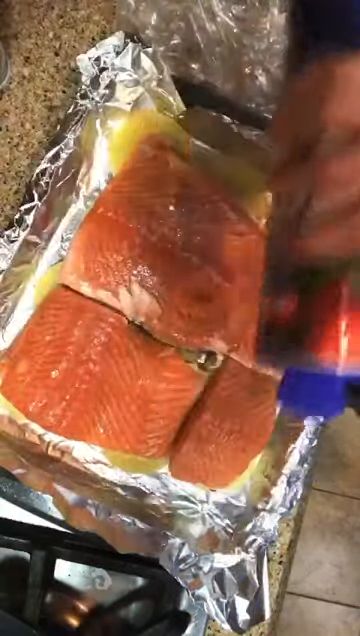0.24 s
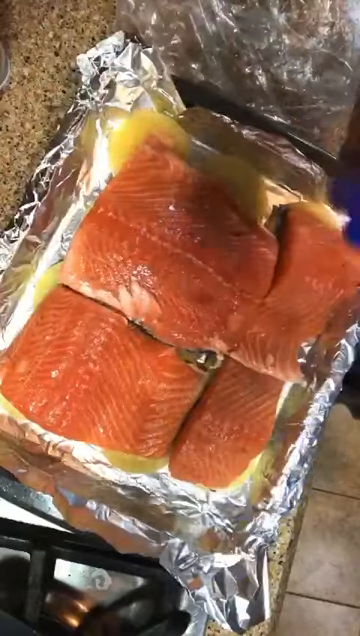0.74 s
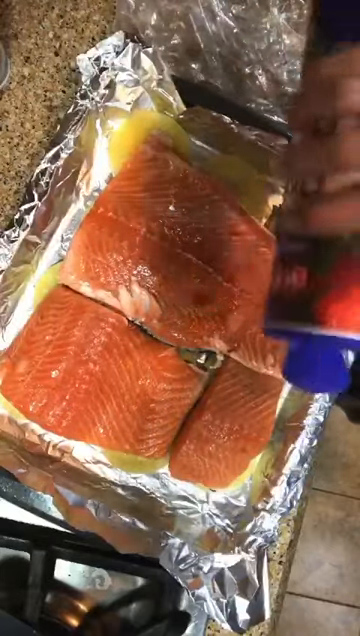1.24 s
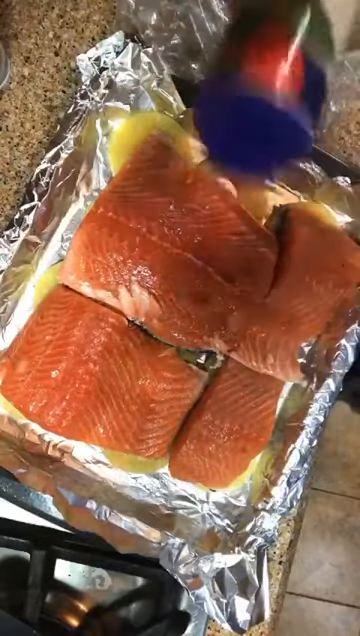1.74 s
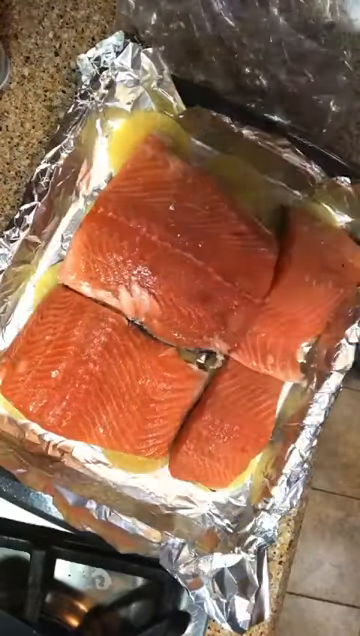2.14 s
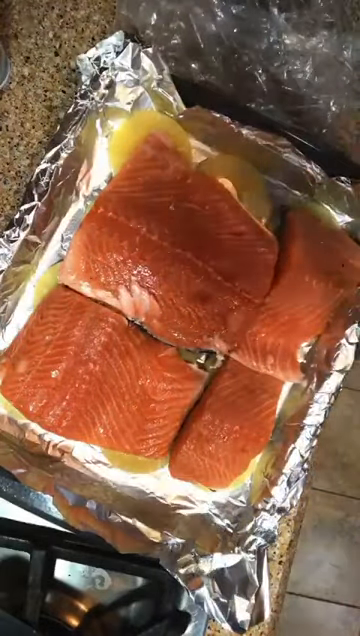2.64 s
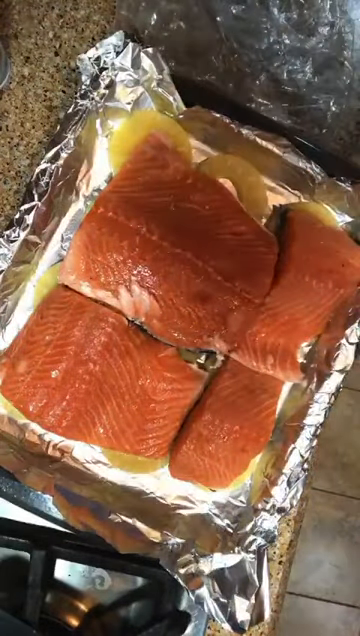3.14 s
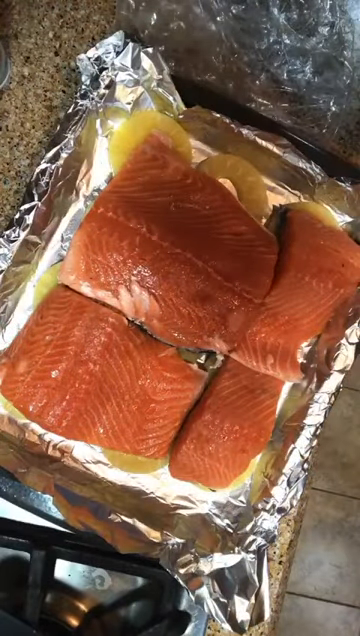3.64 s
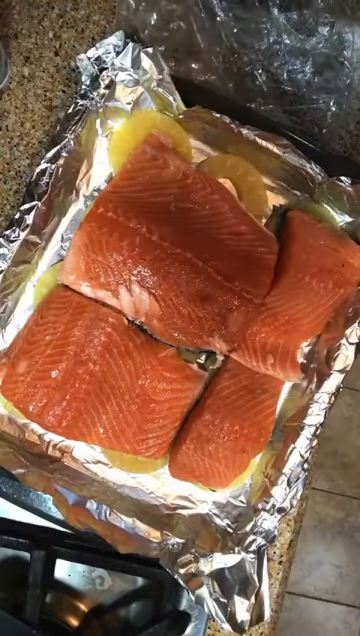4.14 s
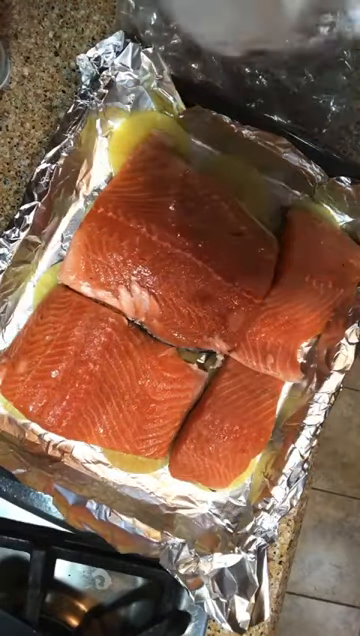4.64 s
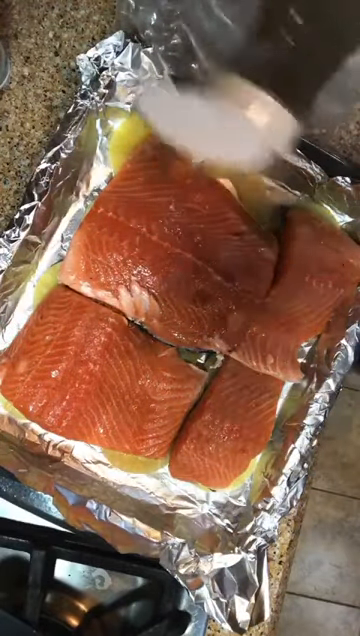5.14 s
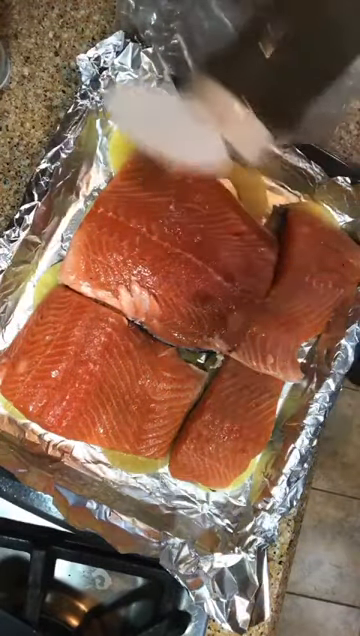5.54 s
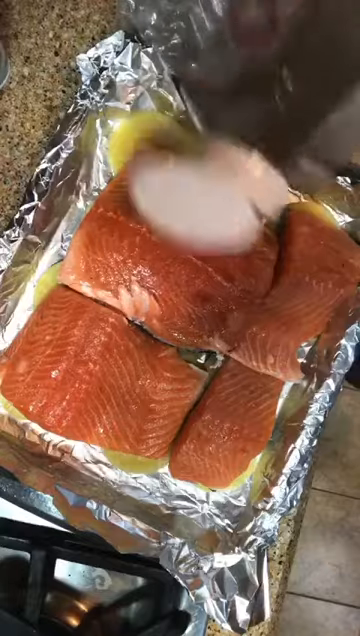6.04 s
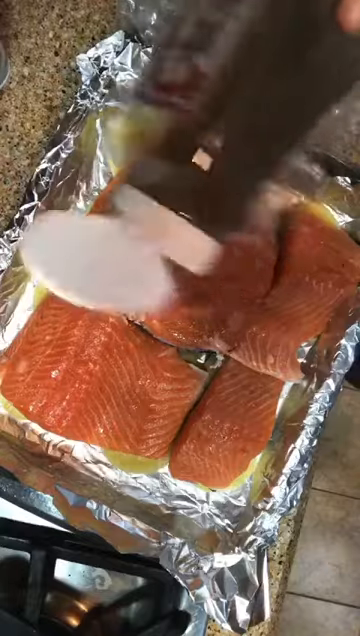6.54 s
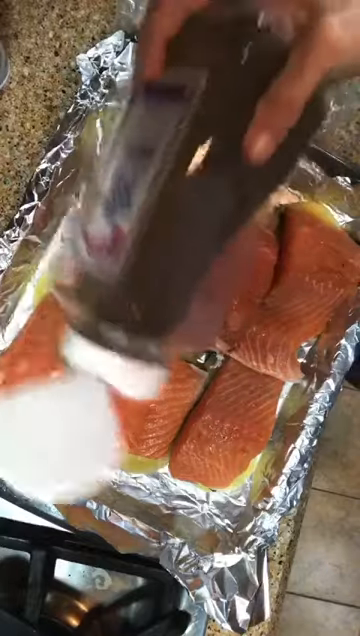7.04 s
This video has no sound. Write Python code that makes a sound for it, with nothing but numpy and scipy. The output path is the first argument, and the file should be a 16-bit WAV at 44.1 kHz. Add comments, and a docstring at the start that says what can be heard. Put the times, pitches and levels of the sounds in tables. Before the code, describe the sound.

Dry seasoning shaken in eight quick rattles, shaker cracked down on a counter, containers knocking and wobbling, then soft finger taps and small pours of grains.

```python
"""Seasoning is shaken over fish in a quiet kitchen: noise-like grain impacts surge up and down the shaker.
A faint wavering tone fades early on; then the shaker is set down, a cracking base over a thudding counter.
A jar chatters and containers knock and wobble as the next one is fetched: damped modes and noise bursts.
Fingers tap, and grains slide out in a few gentle pours of the same impacts.
Throughout, sleeves rub in fine slips, an appliance hums, and a hard room answers the knocks and grains."""
import sys
import numpy as np
from scipy import signal
from scipy.fft import rfft, irfft, next_fast_len
from scipy.io import wavfile
from scipy.ndimage import map_coordinates

SR = 44100
rng = np.random.default_rng(int(sys.argv[2]) if len(sys.argv) > 2 else 0)


def to_wav(s):
    """Save 16-bit WAV."""
    ch = np.atleast_2d(s).T  # columns
    pcm = np.round(np.clip(ch, -1, 1) * 32767)  # PCM
    wavfile.write(sys.argv[1], SR, pcm.astype(np.int16))


N = 321489  # length in samples

# shakes, grains flying to the base on the lift, then to the lid on the throw:
# throw_crest_s, throw_level_db, lift_level_db
SHAKES = [(.152, -50.5, -53), (.365, -52, -56), (0.569, -54, -56.5), (0.811, -51, -54.5), (1.015, -54, -59),
          (1.226, -51.5, -61), (1.478, -51, -56.5), (1.71, -51.5, -56)]
LIFT_LEAD_S = 0.087  # the lift crests this long before the throw
LIFT_RISE_S, LIFT_FALL_S = 0.07, 0.084  # each over 20 dB
THROW_RISE_S, THROW_FALL_S = 0.11, 0.063  # each over 20 dB
# grains sliding in a tilted container: crest_s, level_db, length_s (20 dB up and 20 dB down)
SLIDES = [(2.103, -55.5, 0.26), (3.56, -52.5, 0.22), (4.74, -63.5, 0.61), (5.13, -62, .4)]
SLIDE_RISE_SHARE = 0.51  # part of a slide spent swelling
# a jolt lets the heap slip at once: crest_s, level_db, fall_s (over 20 dB)
SPILLS = [(3.449, -62, .07), (5.016, -65, .14), (5.116, -53, .06), (5.571, -61, 0.22), (6.474, -65.5, 0.24),
          (6.748, -42, 0.06)]
SPILL_RISE_S = 0.016  # over 20 dB
# sharp ticks of coarse grains on the plastic: start_s, level_db, low_cut_hz
TICKS = [(.2882, -34.5, 9050), (.4515, -35, 800), (.457, -41, 2000), (.466, -42, 3000), (.499, -42.5, 2000),
         (.955, -44, 7000), (6.734, -36.5, 1500), (6.746, -35, 6000), (6.753, -43, 5000)]
# colour of grains in a plastic container: pitch_hz, level_db (per Hz, relative)
GRAIN_COLOUR = [(500, -32), (1500, -8.5), (2300, -6.5), (3000, -3.5), (4200, -1.5), (5200, -1.5),
                (6400, 0.5), (8200, -.5), (10200, -2.5), (12000, -1), (14000, 1), (15000, -2),
                (15800, -1.5)]

# the shaker lands and rocks: start_s, level_db, brightness_hz, thud_db (relative to level_db)
LANDINGS = [(2.4324, -14.5, 5500, -0.5), (2.457, -35, 2500, 8.5), (2.482, -31, 2000, -12),
            (2.510, -31.5, 1500, 1), (2.556, -40.5, 1000, 7)]
# modes of the shaker's base: pitch_hz, level_db (relative), t60_s
BASE_MODES = [(346, -9, 0.074), (707, -10, 0.049), (872, -8, 0.038), (976, -11, 0.11), (1052, -2.5, 0.024),
              (1670, -17, 0.016), (1803, -21.5, 0.078), (2280, -10.5, 0.0065), (2680, -22, 0.0075),
              (3560, -7.5, 0.0051)]
# modes of the counter: pitch_hz, level_db (relative), t60_s
COUNTER_MODES = [(92, -13, 0.15), (126, -10, 0.067), (167, -3, 0.074), (208, -1.5, 0.062), (274, -9, 0.047)]
# colour of a bare contact: pitch_hz, level_db (per Hz, relative)
CRACK_COLOUR = [(100, -2), (480, 0), (1000, 12), (1500, 0.5), (2300, 0), (3500, -2.5), (4700, -5.5),
                (6500, -3.5), (8000, -11), (14500, -10)]

# nudges of a light jar: start_s, level_db, brightness_hz, thud_db (relative to level_db)
NUDGES = [(3.170, -37, 2200, -10), (3.1746, -29, 2200, -15), (3.178, -30, 2200, -18),
          (3.184, -33, 1800, -19), (3.221, -39.5, 2200, -1), (3.267, -49, 900, 17.5)]
# modes of the jar: pitch_hz, level_db (relative), t60_s
JAR_MODES = [(366, -5.5, 0.097), (650, -10, 0.035), (750, -10.5, 0.086), (1180, -13, 0.035),
             (1265, -15, 0.067), (1360, -3.5, .05), (1584, -8, .073), (1710, -8.5, 0.034),
             (1945, -2.5, 0.028), (2300, -6.5, 0.022), (2600, -17, .018), (2950, -21, .02),
             (4130, -30, .05), (5400, -27, .05)]
# modes of the jar's lid: pitch_hz, level_db (relative), t60_s
LID_MODES = [(4160, 6, 0.027), (4400, -2, 0.017), (5650, 0, .01)]
LID_CLICK_S, LID_CLICK_DB = 3.26, -52

# bumps and wobbles of a ringing container:
# start_s, level_db, brightness_hz, thud_db, ring_db (the last two relative to level_db)
KNOCKS = [(3.4467, -38, 6000, -7, 6.5), (3.449, -30.5, 2600, 8.5, -3), (3.455, -34.5, 1800, -8, -12),
          (3.604, -20, 3020, -15, -3), (3.608, -24.5, 1800, -1.5, -4), (3.637, -31, 1800, -10, 9.5),
          (3.667, -26, 3200, -23, 0), (3.671, -19.5, 1700, -4, -2.5), (3.712, -25, 2780, -12, 1.5),
          (3.75, -34.5, 1600, -16, -13)]
# modes of the quickly damped walls: pitch_hz, level_db (relative), t60_s
WALL_MODES = [(358, -16, 0.066), (507, -18, 0.049), (762.4, -13.5, 0.12), (945, -12.5, 0.036),
              (1120, -10.5, 0.077), (1233, -9, .07), (1325, -6.5, 0.058), (1374, -11.5, 0.16),
              (1528, -11, .11), (1760, -11.5, 0.036), (1983, -8.5, 0.028), (2210, -13.5, .024),
              (2900, -16, 0.03)]
# container tones that hang on: pitch_hz, level_db (relative), t60_s
LASTING_TONES = [(1623, -14.5, .5), (3720, -24, 0.35)]
# modes of the board under the containers: pitch_hz, level_db (relative), t60_s
SHELF_MODES = [(122, -11.5, .07), (142, -6.5, 0.071), (159, -5.5, 0.075), (200, -6.5, 0.049),
               (237, -12.5, .043)]
# colour of a dull contact: pitch_hz, level_db (per Hz, relative)
CLACK_COLOUR = [(100, -9), (400, -7), (750, -1.5), (1400, 3.5), (2200, -6), (3200, -10.5), (4500, -20.5),
                (8000, -25), (14500, -50)]

# strokes of hand and sleeve: fastest_s, level_db, length_s
RUBS = [(0.954, -54, 0.16), (1.533, -64, 0.21), (2.275, -63.5, 0.23), (4.204, -56.5, 0.21),
        (4.663, -58, 0.3), (5.113, -62, 0.29), (5.61, -66.5, 0.13), (5.81, -58.5, 0.18),
        (6.417, -57.5, 0.14), (6.96, -63, 0.31)]
RUB_RISE_SHARE = 0.42  # part of a stroke spent speeding up
RUB_EDGE_DB = 7.5  # a stroke's ends lie this far below its crest
# colour of the sleeve: pitch_hz, level_db (per Hz, relative)
SLEEVE_COLOUR = [(300, -9), (900, -4), (1500, 0), (2800, -2), (4500, -5.5), (7000, -8.5), (10000, -16.5),
                 (15000, -16)]
# finger taps on a hollow container, pitched by the grip: start_s, level_db, pitch_ratio
TAPS = [(4.380, -43, 0.94), (4.405, -52, 1), (4.548, -42, 0.97), (4.573, -43.5, 1), (6.472, -41, .88),
        (6.5, -50, 0.87)]
# modes of the hollow container: pitch_hz (at pitch_ratio 1), level_db (relative), t60_s
HOLLOW_MODES = [(863, -5, .04), (999, -2, 0.054), (1104, -2.5, 0.056), (1334, -8, 0.035), (1490, -7, 0.038),
                (1850, -11, 0.027), (2310, -7.5, .03)]

# partials of the appliance hum: pitch_hz, level_db (mean rms)
HUM_PARTIALS = [(59.8, -70), (119.9, -62.5), (239.8, -76), (329, -80.5), (359.6, -82.5), (749, -78.5),
                (960, -79)]
# colour of the still room air: pitch_hz, level_db (per Hz, relative)
AIR_COLOUR = [(20, -1), (35, 2), (62, -2), (90, -9.5), (135, -12.5), (200, -15), (330, -17.5), (500, -19),
              (1000, -21), (2000, -26), (4000, -32), (9000, -39.5), (15500, -44.5)]
WAVER_CREST_S, WAVER_DB, WAVER_LENGTH_S = 0.5, -72.5, 1.0  # the faint tone
WAVER_HZ, WAVER_SWING_HZ = 636, 22.2
# decay of the room's tail: pitch_hz, t60_s
ROOM_DECAY = [(100, 0.41), (300, 0.44), (1000, 0.56), (3000, 0.55), (7000, 0.51), (14000, 0.32)]
TOP_HZ = 15800  # upper band limit


def amp(db):
    """Decibels to gain."""
    return 10 ** (np.asarray(db) / 20)


def unit(x):
    """Scale to rms 1."""
    return x / np.sqrt(np.mean(x ** 2) + 1e-20)


def along(points, hz):
    """(Hz, value) points read along a log frequency axis."""
    f, v = np.transpose(points)
    return np.interp(np.log(hz + 1), np.log(f), v)


def filtered(x, response):
    """x with its spectrum multiplied by a response of frequency."""
    m = next_fast_len(len(x) + SR // 2)
    spectrum = rfft(x, m) * response(np.fft.rfftfreq(m, 1 / SR))
    return irfft(spectrum, m)[:len(x)]


def coloured(x, colour):
    """x shaped by a spectral colour, at rms 1."""
    return unit(filtered(x, lambda hz: amp(along(colour, hz))))


def wobble(rate):
    """A smooth random curve with rate knots a second."""
    knots = rng.standard_normal(int(N * rate / SR) + 4)
    return map_coordinates(knots, [np.arange(N) * rate / SR])


def add(track, s, sound):
    """Mix a sound into the track at time s."""
    part = track[round(s * SR):][:len(sound)]
    part += sound[:len(part)]


def ring(modes, scatter_db):
    """A struck body: decaying sines, at new strengths for each blow."""
    t = np.arange(SR // 2) / SR
    out = np.zeros(len(t))
    for k, (hz, db, t60) in enumerate(modes):
        level = amp(db + scatter_db * rng.standard_normal() - 60 * t / t60)
        out += (-1) ** k * level * np.sin(2 * np.pi * hz * t)  # neighbours start in opposite phase
    return out


def burst(colour, t60):
    """A dying burst of noise, standing for many dense, damped modes."""
    t = np.arange(SR // 2) / SR
    return coloured(rng.standard_normal(len(t)), colour) * amp(-60 * t / t60)


def soften(x, hz):
    """A gentle low-pass: a softer contact passes less treble."""
    return signal.lfilter(*signal.butter(1, min(hz, SR / 2 - 1), fs=SR), x)


def in_room(x, wet_db):
    """x with a diffuse tail of noise, each frequency dying at its own speed."""
    hz, t, z = signal.stft(rng.standard_normal(SR), SR, nperseg=256)
    decay = amp(-60 * t / along(ROOM_DECAY, hz)[:, None])
    tail = signal.istft(z * decay, SR, nperseg=256)[1]
    tail *= 1 - np.exp(-np.arange(len(tail)) / SR / 0.006)  # echoes build up from the nearest surfaces
    tail /= np.linalg.norm(tail)
    return x + amp(wet_db) * signal.fftconvolve(x, tail)[:len(x)]


def impacts(rate, spread_db):
    """Random impacts of about unit mean power, rate a second, of varied size."""
    sizes = unit(rng.standard_normal(N) * amp(spread_db * rng.standard_normal(N)))
    chance = np.clip(rate / SR, 1e-3, 1)
    return sizes * (rng.random(N) < chance) / np.sqrt(chance)


def seasoning():
    """Each surge throws grains at the wall: more flow is louder and denser."""
    flow = grain_flow()
    clumps = amp(1.5 + 0.44 * wobble(90))  # grains arrive in small clusters
    rate = 4000 + 20000 * np.sqrt(flow / flow.max())  # impacts a second
    grains = flow * clumps * coloured(impacts(rate, spread_db=0.3), GRAIN_COLOUR)
    for s, db, low_hz in TICKS:
        tick = burst(GRAIN_COLOUR, t60=0.013)
        add(grains, s, amp(db) * (tick - soften(tick, low_hz)))  # smaller grains tick higher
    return in_room(grains, wet_db=-12.5)


def grain_flow():
    """How hard the grains run: two surges for each shake, one for each slide or spill."""
    share = SLIDE_RISE_SHARE
    lifts = sum(surge(s - LIFT_LEAD_S, db, LIFT_RISE_S, LIFT_FALL_S) for s, _, db in SHAKES)
    throws = sum(surge(s, db, THROW_RISE_S, THROW_FALL_S) for s, db, _ in SHAKES)
    slides = sum(surge(s, db, share * length, (1 - share) * length) for s, db, length in SLIDES)
    spills = sum(surge(s, db, SPILL_RISE_S, fall) for s, db, fall in SPILLS)
    return np.sqrt(lifts + throws + slides + spills)


def surge(s, db, rise, fall):
    """Power of a rush of grains cresting at s: up 20 dB in rise, down 20 dB in fall seconds."""
    t = np.arange(N) / SR
    return amp(db - 20 * np.maximum((s - t) / rise, (t - s) / fall)) ** 2


def set_down():
    """The shaker's base cracks on the counter, which thuds beneath it."""
    out = np.zeros(N)
    for s, db, bright_hz, thud_db in LANDINGS:
        base = ring(BASE_MODES, scatter_db=1.5) + amp(-7) * burst(CRACK_COLOUR, t60=0.046)
        thud = amp(thud_db) * ring(COUNTER_MODES, scatter_db=0)
        add(out, s, amp(db) * (soften(base, bright_hz) + thud))
    return in_room(out, wet_db=-6)


def jar():
    """A nudged jar chatters briefly on the shelf and its lid clicks."""
    out = np.zeros(N)
    for s, db, bright_hz, thud_db in NUDGES:
        wall = ring(JAR_MODES, scatter_db=2.5) + amp(-8) * burst(CLACK_COLOUR, t60=0.066)
        thud = amp(thud_db) * ring(SHELF_MODES, scatter_db=4)
        add(out, s, amp(db) * (soften(wall, bright_hz) + thud))
    lid = ring(LID_MODES, scatter_db=1) + amp(-8) * burst(GRAIN_COLOUR, t60=0.023)
    add(out, LID_CLICK_S, amp(LID_CLICK_DB) * lid)
    return in_room(out, wet_db=-5)


def containers():
    """Farther off, a container is bumped and wobbles to rest on the shelf."""
    walls, thuds = np.zeros(N), np.zeros(N)
    for s, db, bright_hz, thud_db, _ in KNOCKS:
        wall = ring(WALL_MODES, scatter_db=1.5) + amp(-4) * burst(CLACK_COLOUR, t60=0.046)
        add(walls, s, amp(db) * soften(wall, bright_hz))
        add(thuds, s, amp(db + thud_db) * ring(SHELF_MODES, scatter_db=2))
    return in_room(walls, wet_db=-4) + in_room(thuds, wet_db=-8.5) + ringing()


def ringing():
    """Every knock feeds energy to the container's lasting tones, which waver as it rocks."""
    t = np.arange(N) / SR
    feed = np.zeros(N)
    for s, db, _, _, ring_db in KNOCKS:
        feed[round(s * SR)] = amp(db + ring_db) ** 2
    out = np.zeros(N)
    for hz, db, t60 in LASTING_TONES:
        kept = amp(-60 / (t60 * SR)) ** 2  # share of energy left after one sample
        energy = signal.lfilter([1], [1, -kept], feed)
        swell = soften(np.sqrt(energy), 150)  # rounds each onset
        tone = np.sin(2 * np.pi * hz * t + 0.43 * wobble(50))
        out += swell * amp(db + 1.3 * wobble(70)) * tone
    return out


def hands():
    """Sleeve and palm rub in fine slips; fingers tap the hollow container."""
    speed = np.sqrt(sum(stroke(*row) ** 2 for row in RUBS))
    slips = coloured(impacts(7000, spread_db=2.5), SLEEVE_COLOUR)
    rub = speed * amp(0.64 * wobble(25)) * slips
    taps = np.zeros(N)
    pad = 1 - np.exp(-np.arange(SR // 2) / SR / 0.0044)  # a fingertip yields before it pushes
    for s, db, ratio in TAPS:
        gripped = [(hz * ratio, level, t60) for hz, level, t60 in HOLLOW_MODES]
        wall = ring(gripped, scatter_db=1) + amp(-5) * burst(CLACK_COLOUR, t60=0.069)
        add(taps, s, amp(db) * pad * wall)
    return rub + in_room(taps, wet_db=-1.5)


def stroke(s, db, length):
    """Gain of one rub: the hand speeds up, passes a rounded crest and slows down."""
    t = np.arange(N) / SR - s
    share = np.where(t < 0, RUB_RISE_SHARE, 1 - RUB_RISE_SHARE)
    away = t / (length * share)  # 0 at the crest, 1 in size at the ends
    return amp(db) / (1 + (amp(RUB_EDGE_DB / 2) - 1) * away ** 2) ** 2


def background():
    """Still room air as coloured noise, and an appliance's slightly unsteady hum as sines."""
    t = np.arange(N) / SR
    hum = np.zeros(N)
    for hz, db in HUM_PARTIALS:
        level = np.sqrt(2) * amp(db + 0.36 * wobble(3.32))  # rms to peak
        hum += level * np.sin(2 * np.pi * hz * t + 0.19 * wobble(1.79))
    return hum + amp(-58.5) * coloured(rng.standard_normal(N), AIR_COLOUR)


def faint_tone():
    """A faint sine in the background wavers in pitch and level, and fades away."""
    t = np.arange(N) / SR
    pitch_hz = WAVER_HZ + WAVER_SWING_HZ * wobble(21.9)
    phase = 2 * np.pi * np.cumsum(pitch_hz) / SR
    away = (t - WAVER_CREST_S) / (WAVER_LENGTH_S / 2)
    arch = np.sqrt(np.clip(1 - away ** 2, 0, 1))
    return arch * amp(WAVER_DB + 2.5 * wobble(16)) * np.sin(phase)


def scene():
    """All the layers, mixed to one channel."""
    kitchenware = seasoning() + set_down() + jar() + containers()
    return (kitchenware + hands() + background() + faint_tone())[None]


def record(dry):
    """The recorder keeps nothing above its band limit."""
    return np.array([filtered(x, lambda hz: hz < TOP_HZ) for x in dry])


dry = scene()
out = record(dry)
to_wav(out)
```